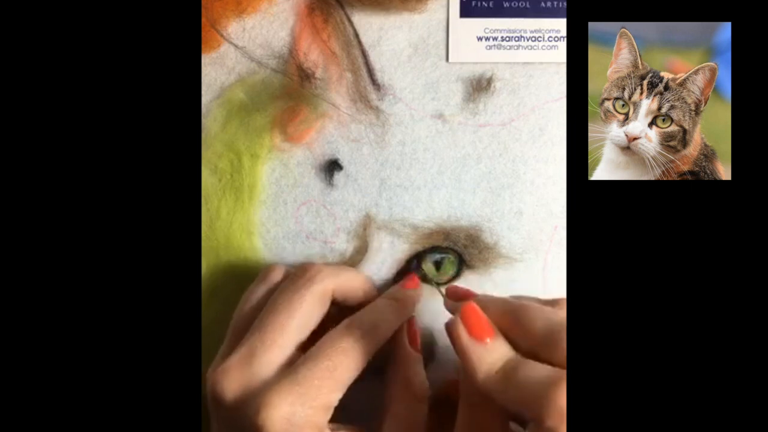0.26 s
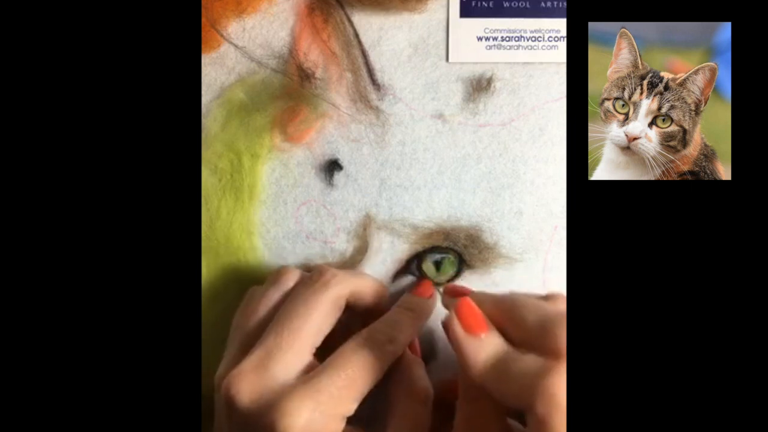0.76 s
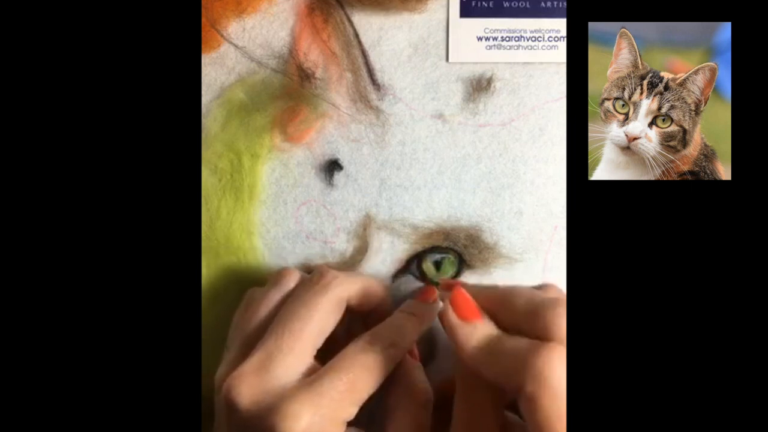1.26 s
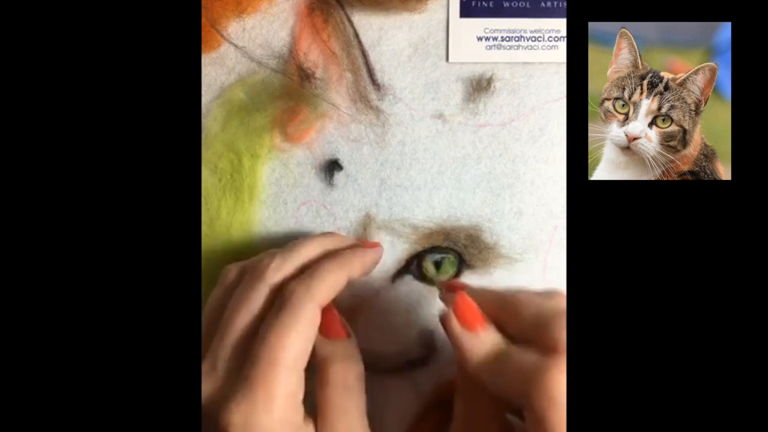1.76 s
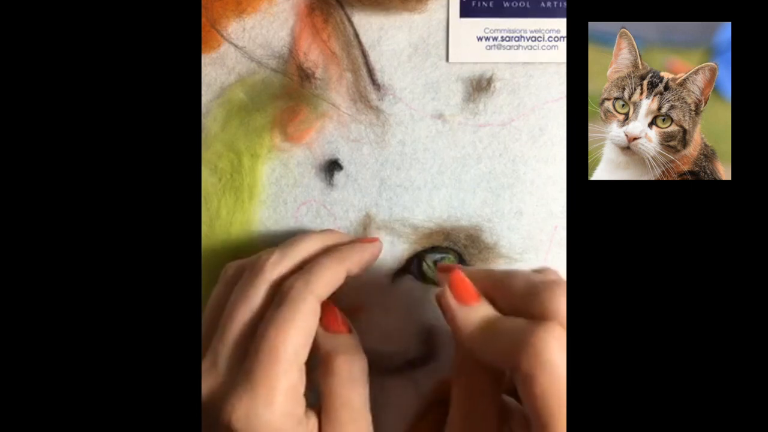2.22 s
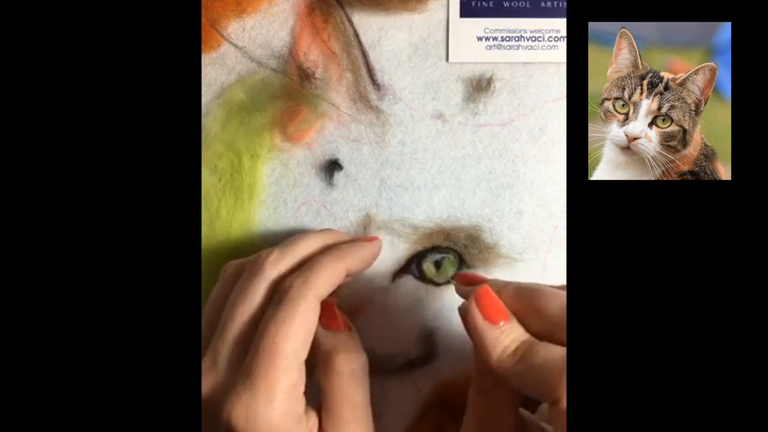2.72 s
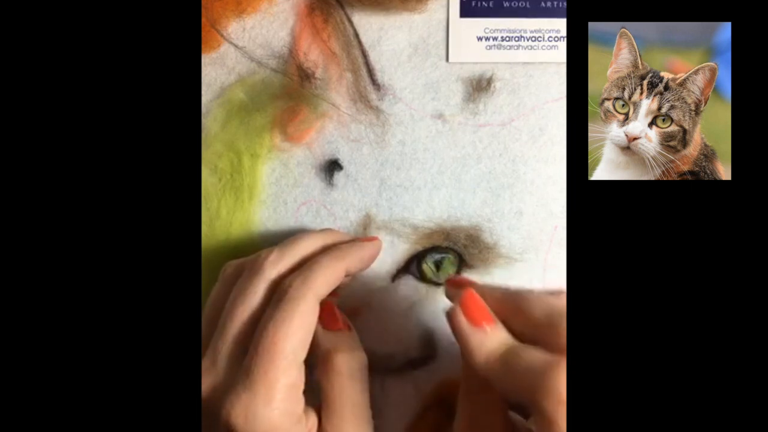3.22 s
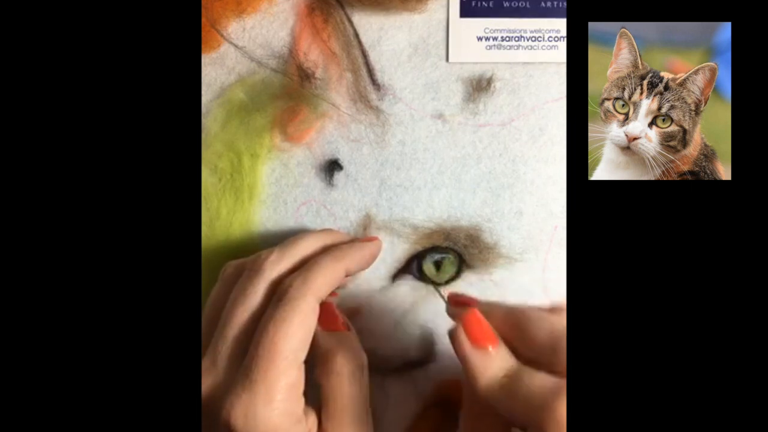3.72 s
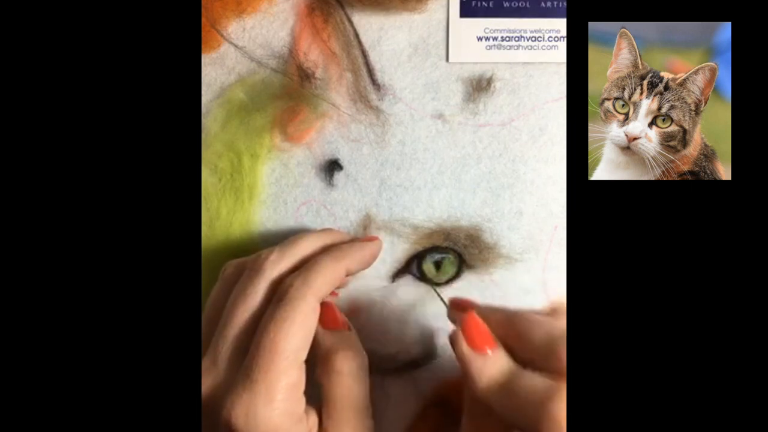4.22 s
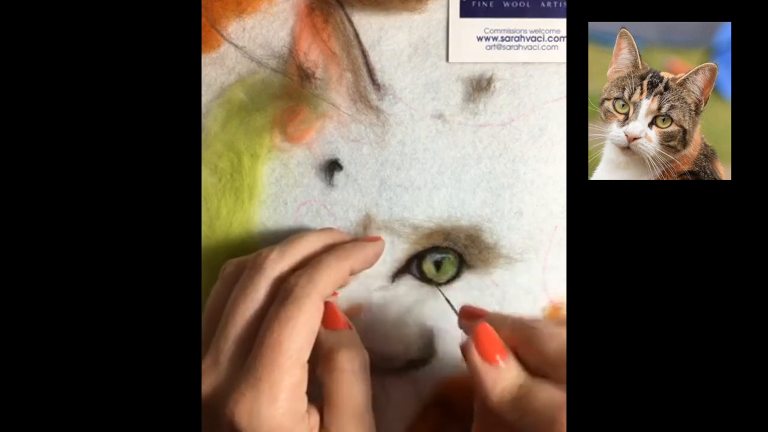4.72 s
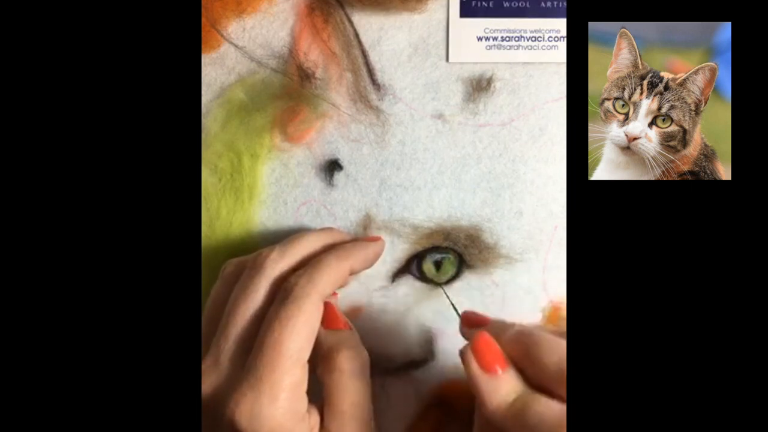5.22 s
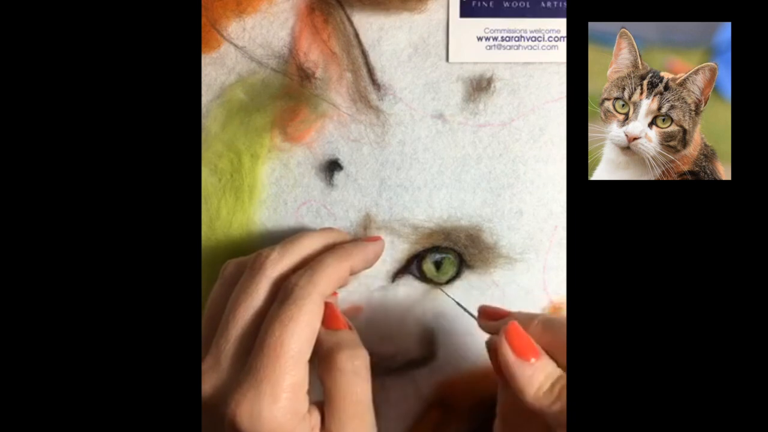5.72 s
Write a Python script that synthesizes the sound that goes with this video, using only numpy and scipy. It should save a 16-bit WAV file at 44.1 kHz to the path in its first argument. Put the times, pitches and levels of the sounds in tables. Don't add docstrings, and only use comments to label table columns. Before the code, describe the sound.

Very close to a small microphone in a quiet room, a felting needle punches wool on a pad at a steady five to six jabs a second. Each jab is a short gritty crunch with snapping fibres and a dull little thud, followed by a much fainter scratchy pull. A short gap comes midway, another near the end, then three last jabs and soft fingertip brushing over hiss and low hum.

```python
import sys
import numpy as np
from scipy import signal
from scipy.fft import rfft, irfft, next_fast_len
from scipy.io import wavfile
from scipy.ndimage import uniform_filter1d

SR = 44100
rng = np.random.default_rng(int(sys.argv[2]) if len(sys.argv) > 2 else 0)


def put_to_file(sound):
    columns = np.atleast_2d(sound).T
    safe = np.clip(columns, -1, 1)
    whole_steps = np.round(safe * 32767)
    wavfile.write(sys.argv[1], SR, whole_steps.astype(np.int16))


def invert_db(x):
    u = np.asarray(x, float) / 20
    return 10 ** u


N = 262836
TIME_S = np.arange(N) / SR

# [start_s, pitch_hz, level_db, overtone_db]
HUM = [(0.0, 61.24, -48.5, -54), (0.46, 61.66, -49.5, -53), (0.56, 55.6, -57, -54),
       (0.909, 61.9, -48.5, -62), (1.0, 63.36, -55, -60), (1.38, 54.5, -55.5, -60),
       (1.511, 58.5, -51, -58.5), (1.64, 58.2, -39.5, -65), (1.76, 56.92, -55, -65),
       (2.17, 53.15, -57, -56.5), (2.319, 56, -46, -69), (2.47, 51.7, -61.5, -60),
       (3.14, 52.45, -53.5, -62), (3.49, 52.4, -61.5, -54.5), (3.68, 55.5, -52.5, -61),
       (4.37, 58.76, -56.5, -60.5), (4.9, 51.83, -57.5, -60.5), (5.96, 50.18, -58, -62)]
# [blur_centre_hz, blur_width_hz, overtone_ratio, overtone_width_hz]
HUM_BLUR = (58.6, 20.4, 1.933, 32.4)
# [freq_hz, density_db]
HISS_SPECTRUM = [(88, -42), (145, -4), (190, -9), (440, -17), (1450, -23), (4910, -27), (11700, -26.5),
                 (15400, -23)]
# [centre_hz, width_hz, removed_db]
PORT_DIPS = [(5000, 1400, -11), (10500, 700, -10)]
# [start_s, length_s, level_db]
BRUSHES = [
    (2.665, 0.014, -58),
    (5.77, 0.027, -53.5),
    (5.856, 0.073, -57),
]
# [freq_hz, level_db]
AIRY_SPECTRUM = [(6000, -16), (9500, -10), (11000, -1.5), (12000, -2), (14000, 4)]
# [freq_hz, level_db]
FIZZ_SPECTRUM = [(1500, -3.5), (4000, -8), (5400, -0.3), (6500, 0), (7600, -3), (8800, -0.5), (10500, -2.5),
                 (14800, 0.5)]
# [centre_hz, width_hz, level_db]
WOOL_MODES = [(350, 150, -8), (617, 216, -2), (827, 292, -2.5), (1562, 372, -3), (3023, 1070, -10)]
# [centre_hz, width_hz, level_db]
THUD_MODES = [(206, 81, 0), (260.3, 61, -1), (318, 70, -6)]
# [start_s, length_s, load_db, fizz_re_load_db, thud_db]
JAB_ROWS = [(0.074, 0.045, -50, -4.5, 0.0), (0.267, 0.03, -47, -2, 4), (0.451, 0.027, -49.5, -1, 0.5),
            (0.634, 0.03, -49.5, -2, -2.5), (0.81, 0.048, -52, -2, 1), (1.001, 0.035, -48.5, -2, 3),
            (1.171, 0.039, -49, 1.5, 1), (1.355, 0.044, -51, -1, 4.5), (1.541, 0.0394, -47, -3, 6.5),
            (1.729, 0.037, -44.5, -7, 1.5), (1.908, 0.055, -50, -1.0, 3.5),
            (2.104, 0.041, -46.5, -3, 0.5), (2.273, 0.044, -47.5, 0, 2.5),
            (2.81, 0.034, -54, -1.5, 3.5), (2.986, 0.047, -46, -2.0, 1.5), (3.168, 0.04, -47.5, -4, 0),
              (3.349, 0.038, -47, -3.5, 5.5), (3.531, 0.042, -48.0, -0.5, 5),
              (3.711, 0.045, -47.5, -4.5, 4.5), (3.882, 0.045, -47.5, -2.5, 2.5),
              (4.05, 0.045, -49, -2.5, 4.5), (4.223, 0.033, -48.5, -2.5, 2.5), (4.391, 0.034, -48.5, -3, 5),
              (4.553, 0.048, -53.5, 1.5, 3), (5.026, 0.0415, -51, -1, 5.5), (5.213, 0.037, -47, -2.5, 4.5),
              (5.388, 0.05, -50.5, 1, 6)]
# [peak_s, load_db, fizz_re_load_db]
PULLS = [(0.164, -64.5, 3), (0.341, -66.5, 0), (0.525, -65.5, 2), (0.716, -66, 0.0), (0.9, -63.5, 0.5),
         (1.056, -63.5, 1), (1.248, -62.5, 0.0), (1.441, -60.5, 1.0), (1.625, -59.0, 0.5), (1.665, -68, -2),
         (1.814, -60, 0.5), (2.013, -59.0, -0.5), (2.18, -60.5, 2), (2.366, -59.5, 2.5), (2.765, -60, -11),
         (2.888, -65, -1.0), (3.068, -61, 3.5), (3.241, -60.5, 0), (3.435, -64, 0.5), (3.611, -62.5, 1.5),
         (3.78, -61.5, 0), (3.968, -60.5, 0), (4.132, -61.5, 1), (4.286, -64.5, 0.0), (4.476, -63.5, -1),
         (4.634, -62.5, 0.5), (5.118, -65, 2), (5.288, -60.0, 1), (5.465, -60.5, 2)]
# [time_s, tick_db, knock_db]
SNAPS = [(0.085, -42, -44), (0.0929, -47, -40.5), (0.0982, -41, -41), (0.1141, -50, -41),
         (0.275, -46, -33), (0.2807, -45, -42), (0.2856, -49, -43), (0.4573, -43.5, -38),
         (0.6401, -47, -49), (0.6551, -38.5, -39), (0.8393, -46, -50), (0.8516, -51, -48),
         (0.9911, -46, -38.5), (1.0089, -47, -56), (1.0183, -35, -31), (1.0239, -44, -57),
         (1.173, -42.5, -28.5), (1.1848, -40.5, -35), (1.1957, -43, -54), (1.2017, -46, -52),
         (1.3573, -43, -33), (1.3608, -48, -38.5), (1.374, -43, -44), (1.3892, -43, -50),
         (1.5472, -51, -39.5), (1.5631, -42, -40), (1.5714, -30, -42), (1.5772, -36.5, -38),
         (1.7351, -40.5, -29.5), (1.7431, -43, -37.5), (1.7534, -37.5, -37), (1.7567, -49, -51),
                (1.772, -45, -40.5), (1.9171, -49, -41.5), (1.943, -51, -42), (1.9456, -40, -43),
                (1.9504, -35.5, -41), (2.104, -41, -40), (2.1072, -45, -46), (2.117, -43, -30),
                (2.1222, -41, -34.5), (2.1328, -33, -37), (2.2815, -45, -33.5), (2.3112, -45, -59),
                (2.819, -44, -32.5), (2.8472, -42, -45), (3.0062, -46, -48), (3.0096, -34, -25),
                (3.0163, -42, -46), (3.02, -39, -49), (3.1742, -45, -33), (3.1928, -39, -29),
                (3.195, -45, -51), (3.199, -41, -36), (3.2061, -46, -54), (3.3546, -42, -32),
                (3.376, -45, -44), (3.3923, -38.5, -43),
         (3.5487, -39, -45), (3.5588, -37, -35), (3.7162, -38.5, -34), (3.7387, -37.5, -36),
               (3.7479, -40, -43), (3.885, -49, -37), (3.8958, -36.5, -29), (3.9078, -35, -39),
               (3.9138, -39, -41), (4.0691, -36, -37), (4.0805, -44, -39.5), (4.088, -36, -32.5),
               (4.2442, -38, -32.5), (4.3969, -50, -36.5), (4.4063, -45, -43), (4.4152, -45.5, -37),
               (4.5617, -45, -37.5), (4.569, -45, -41), (4.5769, -47, -38), (4.5954, -46, -53),
               (4.599, -41.5, -51), (5.0356, -48, -40.5), (5.0541, -51, -56), (5.0767, -42.5, -50),
               (5.2188, -37, -32), (5.2314, -47, -41.5), (5.2431, -37, -42), (5.392, -45, -33.5),
               (5.4103, -37.5, -43), (5.4252, -42, -44)]
# [time_s, tick_db, knock_db]
FINGER_TICKS = [(5.7693, -58, -58), (5.7777, -50, -62), (5.7876, -57, -73), (5.7967, -47, -60),
                (5.8542, -55, -61), (5.865, -53, -65.5), (5.868, -51, -56), (5.9018, -51, -71),
                (5.9203, -52, -74)]
# [time_s, tick_db, knock_db]
STRAYS = [(0.254, -50, -45), (0.2718, -55, -35.5), (0.4393, -56, -47), (0.8166, -48, -44),
          (1.441, -51, -60), (1.624, -54, -49), (1.666, -57, -51.5), (2.367, -53, -59), (2.6698, -56, -63),
          (2.773, -58, -46), (2.9893, -46, -33.5), (3.2404, -51, -59), (3.33, -54, -48.5),
          (3.6963, -58, -45), (3.9667, -53, -51), (4.1304, -57, -62), (4.6336, -54, -52),
          (4.9089, -58, -62), (5.1174, -48.5, -52), (5.1963, -57, -44.5), (5.3744, -59, -45.5),
          (5.8228, -60, -58)]

JABS = JAB_ROWS


def evened(x):
    return x / np.sqrt(np.mean(x ** 2) + 1e-20)


def coloured(x, points):
    hz, db = np.transpose(points)
    size = next_fast_len(len(x))
    bins_hz = np.fft.rfftfreq(size, 1 / SR)
    gain_db = np.interp(np.log(bins_hz + 1), np.log(hz), db)
    return irfft(rfft(x, size) * invert_db(gain_db), size)[:len(x)]


def resonate(x, hz, width_hz):
    turn = np.exp(2j * np.pi * np.cumsum(hz * np.ones(len(x))) / SR)
    pole = np.exp(-np.pi * width_hz / SR)
    return 2 * (turn * signal.lfilter([1 - pole], [1, -pole], x / turn)).real


def resonate_twice(x, hz, width_hz):
    return resonate(resonate(x, hz, width_hz), hz, width_hz)


def rumble():
    s, *columns = np.transpose(HUM)
    hz, low_db, upper_db = (np.interp(TIME_S, s, c) for c in columns)
    blur_hz, blur_width_hz, ratio, upper_width_hz = HUM_BLUR
    tone = np.sqrt(2) * np.sin(2 * np.pi * np.cumsum(hz) / SR)
    blur = evened(resonate_twice(rng.standard_normal(N), blur_hz, blur_width_hz))
    overtone = evened(resonate_twice(rng.standard_normal(N), ratio * hz, upper_width_hz))
    return invert_db(low_db) * (0.95 * tone + 0.73 * blur) + invert_db(upper_db) * overtone


def hiss():
    level_db, drift_db = -60.5, 0.6
    air = coloured(rng.standard_normal(N), HISS_SPECTRUM)
    drift = uniform_filter1d(rng.standard_normal(N), size=5000)
    drift = evened(uniform_filter1d(drift, size=5000))
    hollows = sum(invert_db(db) * resonate(air, hz, width_hz) for hz, width_hz, db in PORT_DIPS)
    return invert_db(level_db + drift_db * drift) * evened(air - hollows)


def crackle(per_s, spread_db, ring_s, smooth):
    size_db = spread_db * np.minimum(rng.exponential(1, N), 3)
    slips = invert_db(size_db) * (rng.random(N) < per_s / SR)
    puffs = signal.lfilter([1], [1, -np.exp(-1 / (ring_s * SR))], slips[::-1])[::-1]
    return (evened(puffs) + smooth) * rng.standard_normal(N)


def brush():
    rise_s, fall_s, edge_db, silent_db = 0.044, 0.024, -22, -120
    level = np.zeros(N)
    for s, length_s, db in BRUSHES:
        times_s = s - rise_s, s, s + length_s, s + length_s + fall_s
        shape_db = np.interp(TIME_S, times_s, (edge_db, 0, 0, edge_db), silent_db, silent_db)
        level += invert_db(db + shape_db)
    fibres = crackle(per_s=600, spread_db=8, ring_s=0.00065, smooth=0.7)
    return level * evened(coloured(fibres, AIRY_SPECTRUM))


def reflections(x):
    t = np.arange(3000) / SR
    taps = rng.standard_normal(len(t)) * (rng.random(len(t)) < 0.05)
    taps *= invert_db(-60 * t / 0.019) * (t > 0.001)
    return signal.oaconvolve(x, taps / np.linalg.norm(taps))[:N]


def rings(x, modes):
    return sum((-1) ** k * invert_db(db) * resonate_twice(x, hz, width_hz)
               for k, (hz, width_hz, db) in enumerate(modes))


def pad(x, spots):
    spot_spread, spot_db = 0.035, 1.5
    s, thud_db = np.transpose(JABS)[[0, -1]]
    wool = []
    for (hz, width_hz, db), (shift, strength) in zip(WOOL_MODES, spots.T):
        moving_hz = hz * (1 + spot_spread * np.interp(TIME_S, s, shift))
        wool.append((moving_hz, width_hz, db + spot_db * np.interp(TIME_S, s, strength)))
    thud = rings(invert_db(np.interp(TIME_S, s, thud_db)) * x, THUD_MODES)
    push = resonate(x, 194, 710)
    return rings(x, wool) - invert_db(1.0) * thud + invert_db(-12.5) * push


def jab_shape(s, length_s, db, fizz_db):
    end_s = s + length_s
    return [(s - 0.032, db - 19, fizz_db - 1),
            (s, db - 5, fizz_db - 1),
            (s + 0.0034, db, fizz_db - 3),
            (end_s - 0.0051, db - 1.5, fizz_db + 1),
            (end_s + 0.0051, db - 16, fizz_db + 0.5),
            (end_s + 0.03, db - 19, fizz_db)]


def pull_shape(s, db, fizz_db):
    return [(s - 0.02, db - 4, fizz_db), (s, db + 2, fizz_db), (s + 0.031, db - 12.5, fizz_db)]


def stroke_shapes():
    return [jab_shape(*jab[:4]) for jab in JABS] + [pull_shape(*pull) for pull in PULLS]


def snags():
    per_s, tick_re_load_db, knock_re_load_db, spread_db = 90, -2, -4, 7
    rows = []
    for shape, draws in zip(stroke_shapes(), rng.random((80, 12, 3))):
        s, load_db, fizz_db = np.transpose(shape)
        at_s = s[0] + np.cumsum(-np.log(draws[:, 0])) / per_s
        tick_db = np.interp(at_s, s, load_db + fizz_db) + tick_re_load_db + spread_db * draws[:, 1]
        knock_db = np.interp(at_s, s, load_db) + knock_re_load_db + spread_db * draws[:, 2]
        rows += list(np.transpose([at_s, tick_db, knock_db])[at_s < s[-1]])
    return rows


def snaps(spots):
    before, after, delay_s, late_from_s = 160, 80, 0.0007, 5.6
    ticks, blows = np.zeros(N), np.zeros(N)
    t = (np.arange(before + after) - before) / SR
    tears = SNAPS + FINGER_TICKS + STRAYS + snags()
    noise = rng.standard_normal((len(tears), 2, len(t)))
    swell = np.where(t < 0, np.exp(t / 0.0017), np.exp(-t / 0.00035))
    rough = np.exp(-abs(t + 0.00043) / 0.00035)
    click = 1.1 * np.exp(-abs(t + 0.00047) / 0.00007)
    for (s, tick_db, knock_db), (a, b) in zip(tears, noise):
        centre = round((s + delay_s) * SR)
        at = slice(centre - before, centre + after)
        ticks[at] += invert_db(tick_db) * a * swell
        push = b * rough + np.sign(b[0]) * click
        blows[at] += invert_db(knock_db) * push / np.linalg.norm(push)
    late = np.arange(N) > late_from_s * SR
    deep_ticks = invert_db(5.5) * coloured(ticks * ~late, FIZZ_SPECTRUM)
    loose_ticks = invert_db(4) * coloured(ticks * late, AIRY_SPECTRUM)
    return deep_ticks + loose_ticks + invert_db(26.5) * pad(blows, spots)


def strokes(spots):
    load, fizz = np.zeros(N), np.zeros(N)
    for rows in stroke_shapes():
        s, load_db, fizz_db = np.transpose(rows)
        on = slice(int(s[0] * SR), int(s[-1] * SR))
        t = TIME_S[on]
        edge = signal.windows.tukey(len(t), 0.15)
        load[on] = np.maximum(load[on], edge * invert_db(np.interp(t, s, load_db)))
        fizz[on] = np.maximum(fizz[on], edge * invert_db(np.interp(t, s, load_db + fizz_db)))
    slips = crackle(per_s=700, spread_db=5.5, ring_s=0.00042, smooth=0.34)
    fine = crackle(per_s=910, spread_db=-0.5, ring_s=0.000096, smooth=1.0)
    unit = np.std(pad(slips, spots))
    through_pad = pad(load * slips, spots) / unit
    through_air = fizz * evened(coloured(fine + 0.82 * slips, FIZZ_SPECTRUM))
    return invert_db(2.5) * through_pad + invert_db(-0.5) * through_air


def scene():
    spots = rng.uniform(-0.95, 1, (len(JABS), 2, len(WOOL_MODES)))
    needle = strokes(spots) + snaps(spots)
    mix = needle + invert_db(-11.0) * reflections(needle) + brush() + rumble() + hiss()
    return mix[None]


def band_limit(x):
    return signal.sosfilt(signal.butter(12, 15740, fs=SR, output="sos"), x)


def record(dry):
    recovery_db_per_s, threshold_db, slope, edge_hz = 450.0, -44.5, 0.2, 15330
    power = uniform_filter1d(np.diff(dry[0], prepend=0) ** 2, size=88)
    power_db = 10 * np.log10(abs(power) + 1e-12)
    fall_db = np.arange(N) * recovery_db_per_s / SR
    held_db = np.maximum.accumulate(power_db + fall_db) - fall_db
    over_db = np.maximum(held_db - threshold_db, 0)
    ducked = dry / invert_db(slope * uniform_filter1d(over_db, size=88, origin=43))
    lowpass = signal.firwin(601, edge_hz, window=("kaiser", 6), fs=SR)
    band = signal.oaconvolve(ducked, lowpass[None], "same")
    return band_limit(band)


dry = scene()
out = record(dry)
put_to_file(out)
```